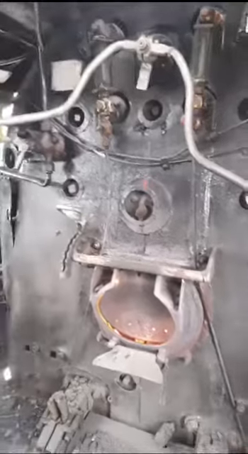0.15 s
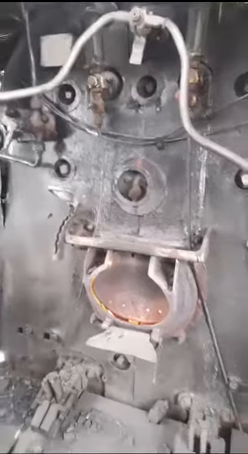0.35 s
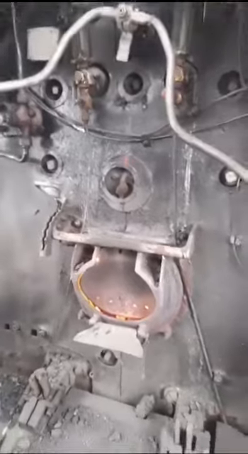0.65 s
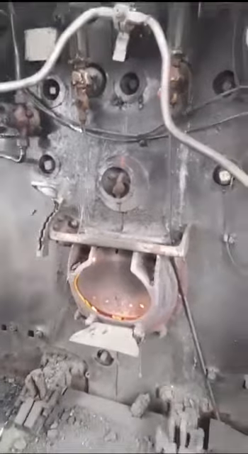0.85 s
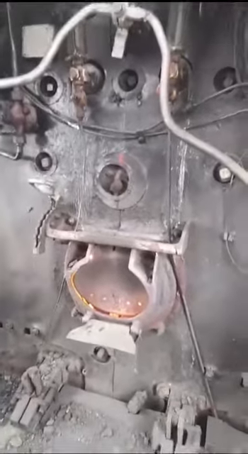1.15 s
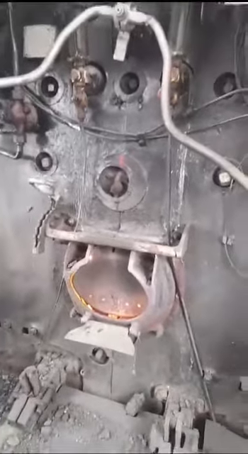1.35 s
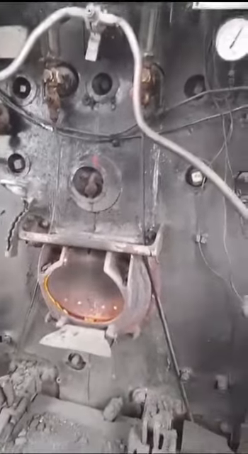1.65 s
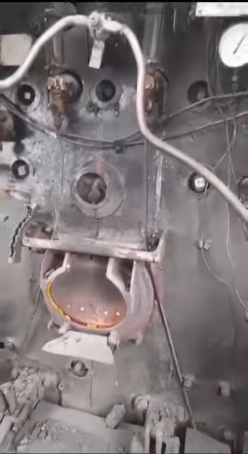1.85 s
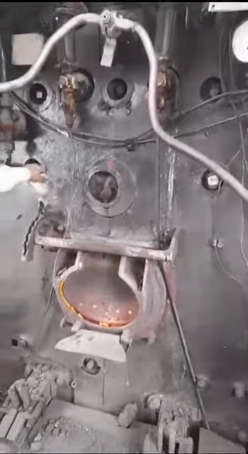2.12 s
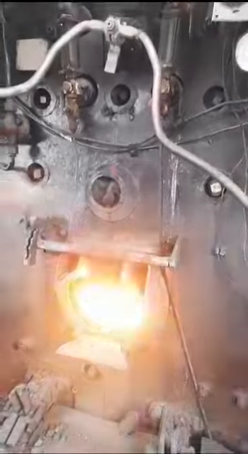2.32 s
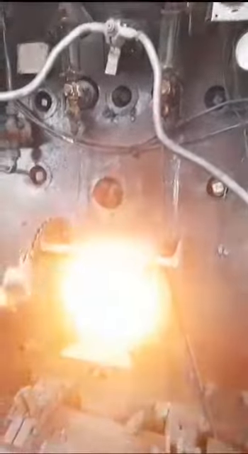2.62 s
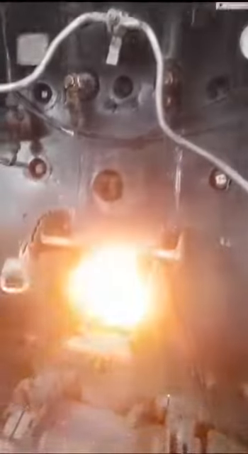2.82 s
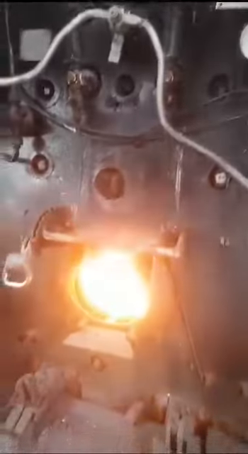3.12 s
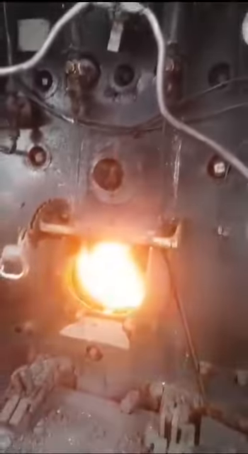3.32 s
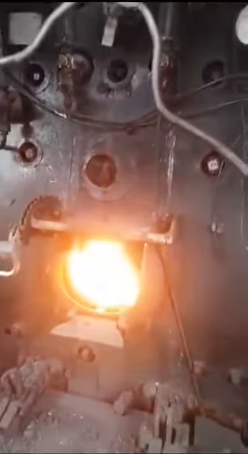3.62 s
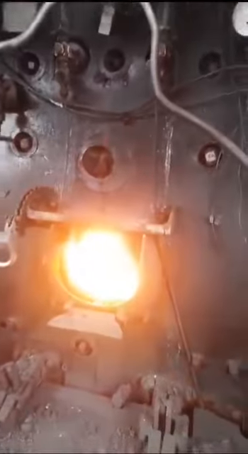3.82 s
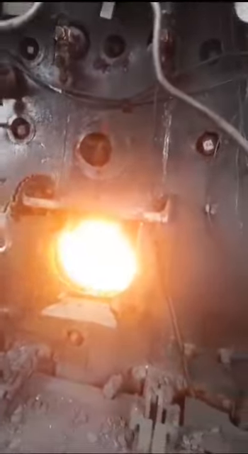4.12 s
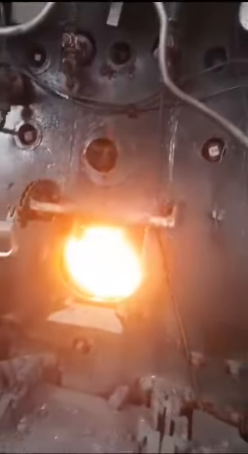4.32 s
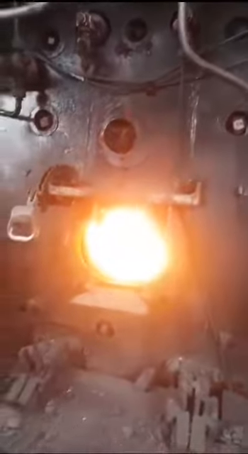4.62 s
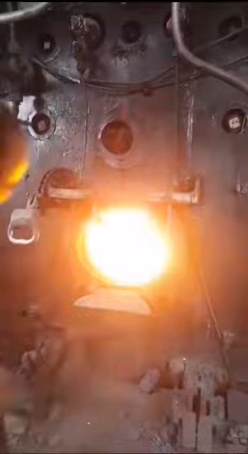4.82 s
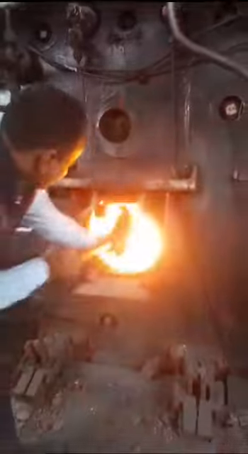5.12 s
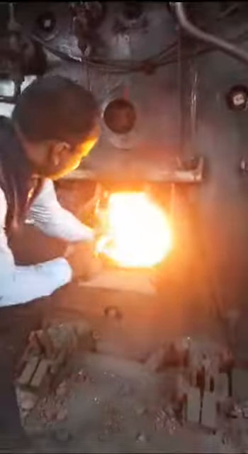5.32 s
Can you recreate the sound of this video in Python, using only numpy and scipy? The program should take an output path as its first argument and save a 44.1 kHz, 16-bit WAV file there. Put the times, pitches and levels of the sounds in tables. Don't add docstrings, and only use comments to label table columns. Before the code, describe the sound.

From the start a coal fire roars in the hollow firebox of a moving steam locomotive: a deep, boxy boom around 100 hertz, surging and fluttering irregularly, with a growl and rushing air above. Thin, bright steam hiss opens quickly and closes more slowly about every 0.6 seconds, stronger around 1.2-1.9. Short, soft puffs pull at the fire several times a second, one clear at 0.7. At 2.45 a light double tick leads to a hard steel clank and snap at 2.55, bouncing and ringing briefly, with tiny ticks by 2.65. The roar continues, with a dull knock near 3.8, a brief strong flare at 4.15 and a faint click at 4.85. At about 5.3 coal scrapes off a shovel, then bursts at 5.36 on a ringing steel plate, lumps scattering until 5.4. Close, wide stereo, with dulled upper treble and slight compression grain.

```python
import sys
import numpy as np
from scipy import signal
from scipy.fft import rfft, irfft, next_fast_len
from scipy.io import wavfile
from scipy.ndimage import uniform_filter1d

SR = 44100
rng = np.random.default_rng(int(sys.argv[2]) if len(sys.argv) > 2 else 0)


def amp(db):
    return 10 ** (np.asarray(db, float) / 20)


def write(x):
    x = np.atleast_2d(x).T
    wavfile.write(sys.argv[1], SR, np.round(np.clip(x, -1, 1) * 32767).astype(np.int16))


N = 240874
SIZE = next_fast_len(N + 8192)
HZ = np.maximum(np.arange(SIZE // 2 + 1) * SR / SIZE, 1)


def rms_one(x):
    return x / np.sqrt(np.mean(x ** 2) + 1e-20)


def in_time(rows):
    s, *columns = np.transpose(rows)
    return [np.interp(np.arange(N) / SR, s, c) for c in columns]


def at_hz(points, hz):
    table_hz, value = np.transpose(points)
    return np.interp(np.log(hz), np.log(table_hz), value)


def closed(points):
    low, high = points[0][0], points[-1][0]
    return amp(at_hz(points, HZ)) * np.minimum(HZ / low, 1) ** 3 * np.minimum(high / HZ, 1) ** 3


def surges(rows, width_s):
    t = np.arange(N) / SR
    return sum(db * np.exp(-.5 * ((t - s) / width_s) ** 2) for s, db in rows)


def drift(rate):
    r = np.exp(-80 * np.pi * rate / SR)
    noise = rng.standard_normal(N // 40 + 2002)
    slow = signal.lfilter([1], [1, -2 * r, r * r], noise)[2000:]
    return np.interp(np.arange(N) / 40, np.arange(len(slow)), rms_one(slow))


# (frequency [Hz], likeness [-1 to 1])
LEFT_RIGHT_LIKENESS = [(30, 0.49), (60, 0.99), (130, 0.92), (200, 1), (300, 0.76), (590, 0.38),
                       (1250, -0.13), (2670, 0.069), (12000, -0.043)]
# (frequency [Hz], left minus right [dB])
LEFT_LEAN = [(60, -3.5), (110, 1.5), (200, -0.5), (350, -2), (640, 2.5), (1150, -1), (2070, 0.5),
             (3740, 1.5), (6760, -2.5), (12200, 1.5)]


def field(gain):
    mid, side = rfft(rng.standard_normal((2, SIZE)))
    left_right = np.array([[1], [-1]])
    alike = np.clip(at_hz(LEFT_RIGHT_LIKENESS, HZ), -1, 1)
    pair = np.sqrt(1 + alike) * mid + np.sqrt(1 - alike) * side * left_right
    return pair * gain * amp(at_hz(LEFT_LEAN, HZ) / 2 * left_right)


def turbulent(gain, shared_db, own_db, shared_rate, own_rate, count):
    spectrum, together, out = field(gain), drift(shared_rate), 0
    used = HZ[gain > gain.max() / 100]
    place = np.clip(np.log(HZ / used[0]) / np.log(used[-1] / used[0]), 0, 1) * (count - 1)
    for k in range(count):
        band = irfft(spectrum * np.clip(1 - abs(place - k), 0, 1), SIZE)[:, :N]
        out = out + band * amp(shared_db * together + own_db * drift(own_rate))
    return rms_one(out)


def bursts(rows, points):
    spectrum, out = field(closed(points)), np.zeros((2, N))
    scale = np.std(irfft(spectrum, SIZE))
    place = np.clip(np.log2(HZ / 1400) + 2, 0, 4)
    octaves = [irfft(spectrum * np.clip(1 - abs(place - k), 0, 1), SIZE)[:, :N] / scale for k in range(5)]
    for s, level_db, rise, t60, tilt_db in rows:
        start = round(s * SR)
        t = np.arange(min(N - start, SR // 2)) / SR
        swell = 1 - np.exp(-t / max(rise, 1e-4))
        for k, band in enumerate(octaves):
            stop = start + len(t)
            fall = amp(-60 * t / max(t60, .01) * 0.97 ** (k - 2))
            out[:, start:stop] += amp(level_db + tilt_db * (k - 2.5)) * swell * fall * band[:, start:stop]
    return out


def struck(hits, modes, spread_db):
    out, at = np.zeros((2, N)), np.array([round(s * SR) for s, db in hits])
    blow_db = np.array(hits)[:, 1]
    start, stop = at.min(), min(at.max() + SR // 2, N)
    for hz, level_db, t60 in modes:
        for split in (.985, 1.012):
            r, w = amp(-60 / (t60 * SR)), 2 * np.pi * hz * split / SR
            strength = amp(blow_db + level_db + spread_db * rng.standard_normal((2, len(at))))
            clicks = np.zeros((2, stop - start))
            clicks[:, at - start] = strength * rng.choice([-1, 1], (2, len(at)))
            out[:, start:stop] += signal.lfilter([0, np.sin(w)], [1, -2 * r * np.cos(w), r * r], clicks)
    return out


# (time [s], level [dB])
FIRE_STRENGTH = [(0.0, -17), (0.23, -17.5), (1.29, -18), (1.38, -19.5), (1.44, -19.5), (1.58, -15),
                 (1.93, -16.5), (2.46, -14.5), (2.57, -18), (2.71, -19), (3.39, -19), (3.44, -17),
                 (3.71, -22.5), (3.78, -21.5), (4.04, -20), (4.15, -7), (4.2, -18.5), (5.46, -16)]


def fire_strength():
    return in_time(FIRE_STRENGTH)[0]


# (time the gland shuts [s], level when shut [dB], top level of the next stroke [dB],
# slowness of shutting and opening [times])
PISTON_STROKES = [
    (-.1, -38, -31.5, 0.85),
    (0.498, -48.5, -31.5, 0.76),
    (1.095, -45, -30, 1.02),
    (1.918, -50, -27.5, 0.89),
    (2.529, -44.5, -35, 1.47),
    (3.144, -49, -32, 0.85),
    (3.752, -49, -30, 0.88),
    (4.365, -46.5, -29, 0.8),
    (4.951, -47, -27.5, 0.8),
    (5.53, -55, -34, 0.65),
]


def strokes():
    shut, low_db, top_db, slowness = np.transpose(PISTON_STROKES)
    open_s, shut_s = 0.25 * slowness, 0.35 * slowness
    t = np.arange(N) / SR
    k = np.searchsorted(shut, t, "right") - 1
    opening = 1 - (1 - np.clip((t - shut[k]) / open_s[k], 0, 1)) ** 1.37
    closing = 1 - (1 - np.clip((shut[k + 1] - t) / shut_s[k + 1], 0, 1)) ** 1.55
    return top_db[k] - (top_db[k] - low_db[k]) * (1 - opening) - (top_db[k] - low_db[k + 1]) * (1 - closing)


def pulled_along(fire_db, stroke_db, offset_db, fire_share, stroke_share):
    mean_db = fire_db.mean()
    return mean_db + offset_db + fire_share * (fire_db - mean_db) + stroke_share * (stroke_db - stroke_db.mean())


# (frequency [Hz], level [dB per Hz])
RUSH_SPECTRUM = [(210, -33), (350, -5), (429, -6.5), (767, -6.5), (885, -9.5), (1370, -11.5), (2920, -23),
                 (4000, -28), (5200, -22.5), (8800, -120)]


def rush(fire_db, stroke_db):
    level_db = pulled_along(fire_db, stroke_db, offset_db=-9.5, fire_share=0.73, stroke_share=0.046)
    air = turbulent(closed(RUSH_SPECTRUM), shared_db=.3, own_db=.9, shared_rate=14.0, own_rate=15.0, count=6)
    return amp(level_db) * air


# (frequency [Hz], level [dB per Hz])
HISS_SPECTRUM = [(1500, -2.5), (2600, -3), (3400, -1.5), (4000, 1), (4700, -0.5), (6200, 4), (7000, 1.5),
                 (9000, -2.5), (12500, -9)]


def steam(level_db):
    hiss = turbulent(closed(HISS_SPECTRUM), shared_db=.3, own_db=.7, shared_rate=8, own_rate=12, count=6)
    body = irfft(rfft(hiss, SIZE) * (HZ < 8050), SIZE)[:, :N]
    peak_db = level_db.max()
    body_db = peak_db + 0.93 * (level_db - peak_db) - .6
    return amp(level_db) * (hiss - body) + amp(body_db) * body


# (time [s], peak level [dB], t60 [s])
DRAUGHT_PUFFS = [(.11, -22, 0.16), (.29, -17, 0.12), (0.715, -12, 0.1), (0.99, -20.5, 0.32),
                 (1.142, -26.5, 0.39), (1.319, -23.5, 0.46), (1.529, -17.5, 0.16), (1.689, -26, 0.16),
                 (2.158, -15.5, 0.21), (2.29, -24, 0.2), (2.45, -14, 0.19), (2.739, -21, 0.32),
                 (2.89, -23, 0.15), (3.362, -15.5, 0.22), (3.501, -19.5, 0.2), (3.654, -22.5, 0.19),
                 (3.787, -27.5, 0.43), (3.959, -16.5, 0.35), (4.139, -27, 0.5), (4.257, -26, 0.3),
                 (4.415, -21, 0.2), (4.567, -14.5, 0.45), (4.713, -21, 0.38), (4.85, -24, 0.28),
                 (4.975, -17, 0.15), (5.159, -13, 0.36), (5.283, -27, 1)]
# (frequency [Hz], level [dB per Hz])
PUFF_SPECTRUM = [(250, -15), (450, -5.5), (900, -3.5), (1500, -3), (2500, -8), (5000, -25), (9000, -42)]


def puffs():
    rows = [(s, db, 0.019, t60, -2 + 0.3962 * (db + 11.5)) for s, db, t60 in DRAUGHT_PUFFS]
    return amp(-0.5) * bursts(rows, PUFF_SPECTRUM)


# (time [s], level [dB])
CATCH_BLOWS = [
    (2.4463, -33),
    (2.4578, -33),
    (2.4655, -33),
    (2.498, -31),
    (2.5466, -17),
    (2.5495, -21),
    (2.649, -37),
    (2.664, -36),
]
# (frequency [Hz], level [dB], t60 [s])
CATCH_MODES = [(2200, -12, .15), (3920, 0, .025), (4690, -10, .09), (5125, -14, .09), (6100, -17, .06)]


def catch():
    return amp(-2.0) * struck(CATCH_BLOWS, CATCH_MODES, spread_db=-2)


# (time [s], level [dB])
LEVER_BLOWS = [
    (2.4578, -23),
    (2.5455, -15),
    (2.5475, -11),
    (2.5505, -12),
    (2.563, -13),
    (2.572, -15),
    (2.595, -22),
]
# (frequency [Hz], level [dB], t60 [s])
LEVER_MODES = [(610, 0, .12), (818, -3, .12), (1082, -3, .12), (1443, 1, .2), (1600, -4, .2),
               (1787, -3, .16), (2169, -15, .2), (2600, -13, .15), (2783, -13, .15), (3790, -11, .1),
               (4527, -16, .1), (4915, -16, .12), (6842, -12, .06), (7391, -3, .045)]


def lever():
    return amp(-13.5) * struck(LEVER_BLOWS, LEVER_MODES, spread_db=2)


# (time [s], level [dB], t60 [s], brightness [dB per octave])
CRACK_BURSTS = [(2.4463, -25, .3, 2), (2.4578, -25, .2, -2), (2.5445, -24, .03, 1), (2.5462, -19, .035, 1),
                (2.548, -16, .3, -7), (2.563, -19, .35, -7), (2.595, -26, .3, -5), (2.649, -31, .3, -1),
                (3.757, -36, .06, 4), (3.787, -19, .07, -7), (4.842, -27, .02, 6)]
# (frequency [Hz], level [dB per Hz])
CRACK_SPECTRUM = [(300, -8), (600, -3), (1500, 1), (3000, 1), (4200, 5), (6000, 1.5), (12000, -11.5)]


def cracks():
    rows = [(s, db, .0004, t60, tilt) for s, db, t60, tilt in CRACK_BURSTS]
    return amp(-2.5) * bursts(rows, CRACK_SPECTRUM)


# (time [s], level [dB], rise [s], t60 [s], brightness [dB per octave])
COAL_BURSTS = [
    (5.31, -23, .02, .8, 0),
    (5.3635, -11.5, .0004, .06, 1),
    (5.366, -14, .001, .16, -1),
    (5.379, -18, .002, .07, 0),
    (5.387, -19, .001, .05, 0),
    (5.393, -14, .001, .035, -1),
    (5.4, -27, .004, .4, -3),
]
# (frequency [Hz], level [dB per Hz])
COAL_SPECTRUM = [(400, 0), (1200, 3), (2100, 4), (3500, 2), (3950, -22), (4250, -3), (5500, -4),
                 (7500, -12)]


def coal_spill():
    return amp(-1.0) * bursts(COAL_BURSTS, COAL_SPECTRUM)


# (time [s], level [dB])
COAL_BLOWS = [
    (5.3637, -11),
    (5.3675, -13),
    (5.372, -15),
    (5.379, -16),
    (5.386, -18),
    (5.394, -20),
]
# (frequency [Hz], level [dB], t60 [s])
PLATE_MODES = [(834, -5, .15), (1238, -6, .1), (1500, -5, .08), (1750, -6, .08), (2046, -2, .1),
               (2336, -2, .1), (2600, -6, .07), (2848, -9, .07), (3100, -8, .06), (3311, -7, .06),
               (3499, -8, .08), (4436, -10, .06), (4678, -7, .045), (5378, -3, .05)]


def coal_on_plate():
    return amp(-10.5) * struck(COAL_BLOWS, PLATE_MODES, spread_db=2)


# (frequency [Hz], width [Hz], level [dB])
FIREBOX_MODES = [(65, 57, -8), (106, 12, -3), (177, 45, -6), (246, 95, -4.5), (335.6, 91, -9)]
# (frequency [Hz], level [dB per Hz])
FLAME_SPECTRUM = [(13, -39), (22, -12), (108, 20.5), (172, 11.5), (202, 3.5), (289, 12), (381, -5),
                  (700, -17.5), (910, -62), (1540, -120)]
# (time [s], level [dB])
BOOM_SURGES = [(.22, 1), (.55, -3.5), (.67, 6), (1.01, 5.5), (1.37, 5.5), (1.56, 4), (2.0, 2), (2.07, -6),
               (2.36, 5), (2.46, -4), (2.58, -14), (3.08, 1.5), (3.21, -7.5), (3.44, 4), (3.82, 6.5),
               (4.15, -4.5), (4.53, 5), (4.77, 6), (4.88, 3), (4.98, -3.5)]
# (time [s], level [dB])
SECOND_TONE_SURGES = [(.1, 1.5), (.35, 1.5), (.6, 5.5), (.85, 5.5), (1.1, 4.5), (1.3, 3), (1.5, -5),
                      (1.75, 1.5), (1.95, 0), (2.05, 9), (2.2, 2), (2.4, -10), (2.6, 1), (2.8, 3.5),
                      (3.0, -2), (3.2, -0.5), (3.42, 2), (3.55, 1.5), (3.75, 1), (3.97, 7), (4.17, 9),
                      (4.3, 3), (4.45, 5), (4.6, 3), (4.8, -2), (4.95, 6), (5.1, 7.5), (5.25, 3), (5.4, -9)]
# (time [s], level [dB])
UPPER_SURGES = [(.15, 1.5), (.45, -3), (.8, 1), (.97, -1.5), (1.2, 2), (1.4, 3.5), (1.55, 0.5), (1.7, 3),
                (2.0, 2.5), (2.25, 1.5), (2.48, 0.5), (2.8, 3), (3.07, -8.5), (3.3, -2), (3.5, 1),
                (3.75, 2), (4.1, 4), (4.27, 4), (4.5, -1.5), (4.75, 2), (5.0, -2), (5.2, -1), (5.4, 1)]


def roar(fire_db, stroke_db):
    boom_db = fire_db - 2 + surges(BOOM_SURGES, width_s=0.042)
    growl_db = pulled_along(fire_db, stroke_db, offset_db=-5, fire_share=0.34, stroke_share=0.085)
    growl_db = growl_db + surges(UPPER_SURGES, width_s=0.035)
    deep_db = uniform_filter1d(boom_db, size=SR // 3) - 8.0
    hollow = sum(amp(db) ** 2 / (1 + (2 * (HZ - hz) / width) ** 2) ** 2 for hz, width, db in FIREBOX_MODES)
    gain = np.sqrt(hollow + (0.19 * closed(FLAME_SPECTRUM)) ** 2)
    middle, upper = np.clip((HZ - 65) / 25, 0, 1), np.clip((HZ - 160) / 60, 0, 1)
    deep = turbulent(gain * np.sqrt(1 - middle), shared_db=0.9, own_db=-3.5,
                     shared_rate=3.4, own_rate=2.6, count=2)
    boom = turbulent(gain * np.sqrt(middle * (1 - upper)), shared_db=-2.0, own_db=0.0,
                     shared_rate=11.8, own_rate=6.5, count=3)
    growl = turbulent(gain * np.sqrt(upper), shared_db=2.0, own_db=-0.43,
                      shared_rate=5.7, own_rate=16.0, count=4)
    second = signal.sosfilt(signal.butter(2, [135, 205], "band", fs=SR, output="sos"), boom + growl)
    extra = amp(surges(SECOND_TONE_SURGES, width_s=0.045)) - 1
    return amp(deep_db) * deep + amp(boom_db) * boom + amp(growl_db) * (growl + extra * second)


def scene():
    fire_db, hiss_db = fire_strength(), strokes()
    moving_gas = rush(fire_db, hiss_db) + steam(hiss_db + 6.5) + puffs()
    knocks = catch() + lever() + cracks()
    coal = coal_spill() + coal_on_plate()
    return moving_gas + knocks + coal + roar(fire_db, hiss_db)


# (time [s], level [dB])
GAIN_CHANGES = [
    (2.546, 1),
    (5.4, -1.5),
]


def gain_control():
    t, ahead_s, release_s = np.arange(N) / SR, 0.016, 0.35
    gain_db = 0
    for s, db in GAIN_CHANGES:
        shift = np.clip((t - s) / ahead_s + 1, 0, 1)
        gain_db = gain_db + db * shift * np.exp(-np.maximum(t - s, 0) / release_s)
    return amp(gain_db)


# (frequency [Hz], level [dB])
MICROPHONE_PORT = [(20, 0.5), (6400, 1), (6900, -1), (7300, -5), (7700, -11), (8050, -20), (8400, -6),
                   (9000, -4.5), (10500, 1.5), (11400, 5), (11850, -5)]


def microphones(x):
    port = amp(at_hz(MICROPHONE_PORT, HZ)) * (HZ < 11850)
    return irfft(rfft(x, SIZE) * port, SIZE)[:, :N]


# (frequency [Hz], level [dB])
SILENCE_LIMIT = [(900, -16), (1500, -9.5), (2200, -6.5), (3500, -4.8), (5000, -5), (6600, -6.5), (6950, -4),
                 (7250, 3), (7700, 4.5), (8100, 7), (8500, 0), (8900, -3.5), (10500, -5), (11300, -4.5),
                 (11750, 1)]


def starved(x, chance_db):
    pair = np.array([[1, 1.0], [1, -0.97]])
    hz, _, cells = signal.stft(pair @ x / 2, SR, nperseg=1024)
    edges = np.unique(np.geomspace(20, 300, 66).astype(int))
    level_db = 10 * np.log10(np.add.reduceat(abs(cells) ** 2, edges, axis=1) + 1e-20)
    level_db -= np.median(level_db, axis=2, keepdims=True)
    luck = rms_one(uniform_filter1d(rng.standard_normal(level_db.shape), size=5, axis=2))
    kept = .17 * level_db + chance_db * luck > at_hz(SILENCE_LIMIT, hz[edges])[:, None]
    band = np.clip(np.searchsorted(edges, np.arange(len(hz)), "right") - 1, 0, None)
    return pair @ signal.istft(cells * kept[:, band], SR, nperseg=1024)[1][:, :N]


# (frequency [Hz], level [dB])
WEAK_LIMIT = [(500, -14), (1200, -8), (3000, -4), (6300, -4), (7200, 1), (8600, 1), (10000, -2), (11500, 0)]


def thinned(x):
    pair = np.array([[1, 1], [1, -1.005]])
    hz, _, cells = signal.stft(pair @ x / 2, SR, window="cosine", nperseg=2048)
    power = abs(cells) ** 2
    limit = amp(at_hz(WEAK_LIMIT, np.maximum(hz, 1)))[:, None] ** 2
    kept = power > uniform_filter1d(power, size=16, axis=1) * limit
    return pair @ signal.istft(cells * kept, SR, window="cosine", nperseg=2048)[1][:, :N]


def band_limit(x):
    return signal.sosfilt(signal.butter(12, 12800, fs=SR, output="sos"), x)


def record(dry):
    rounded = .95 * np.tanh(gain_control() * dry / .95)
    mix = thinned(starved(microphones(rounded), chance_db=4))
    return band_limit(mix)


dry = scene()
out = record(dry)
write(out)
```